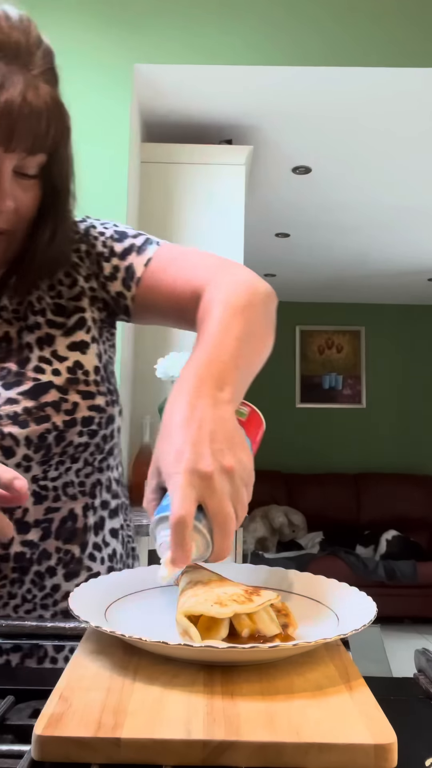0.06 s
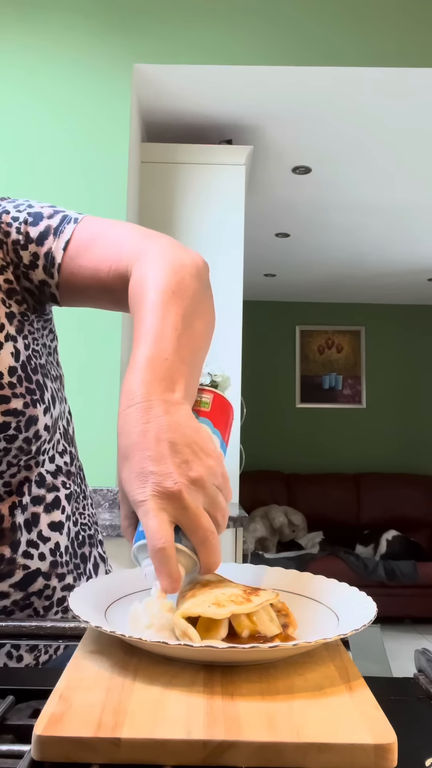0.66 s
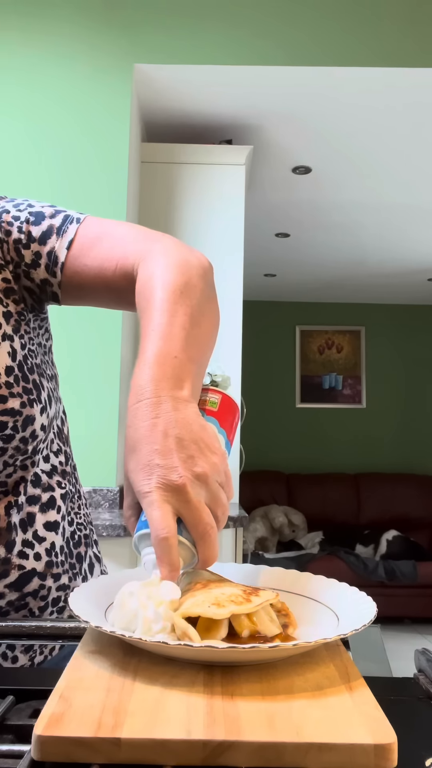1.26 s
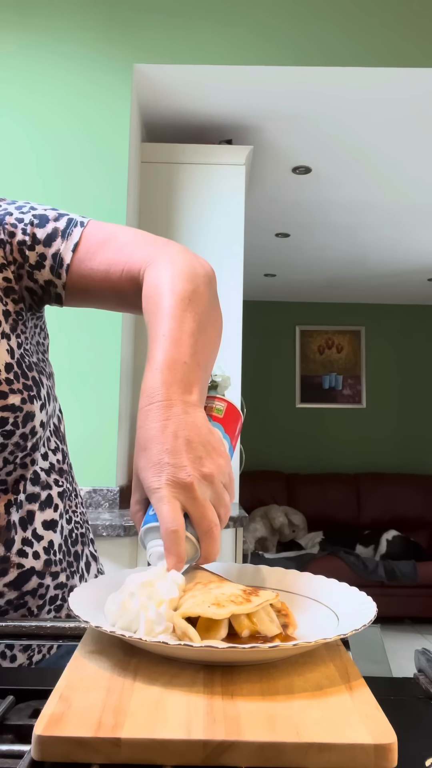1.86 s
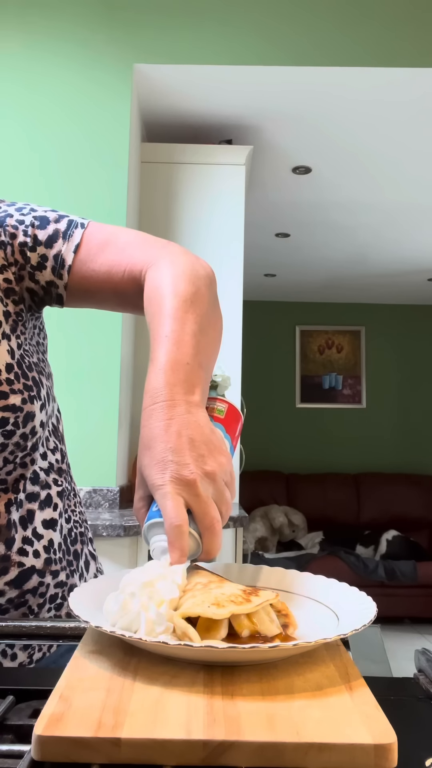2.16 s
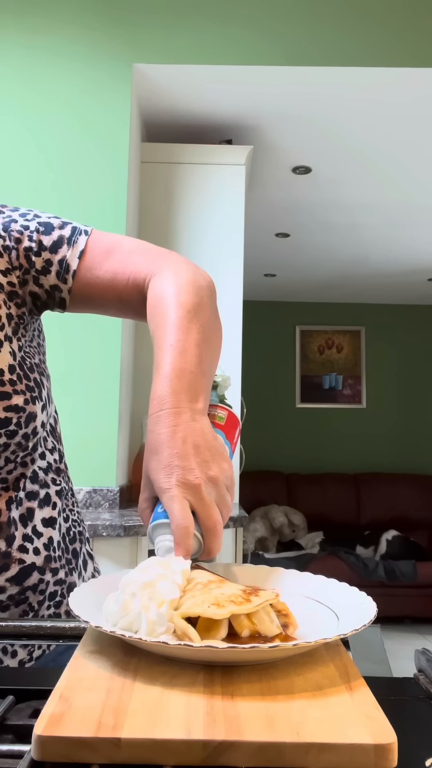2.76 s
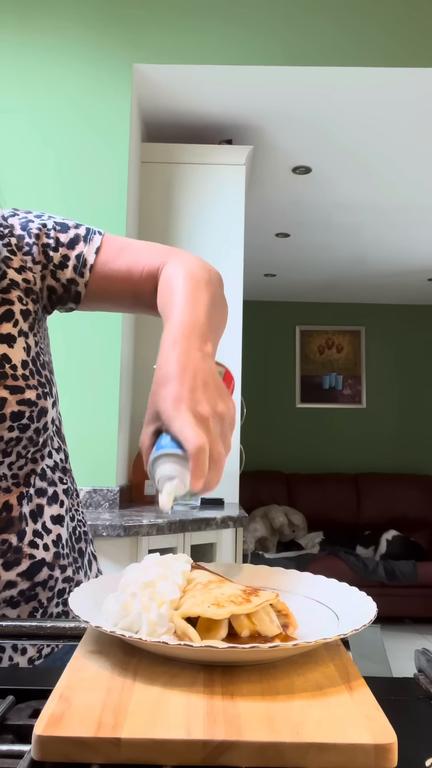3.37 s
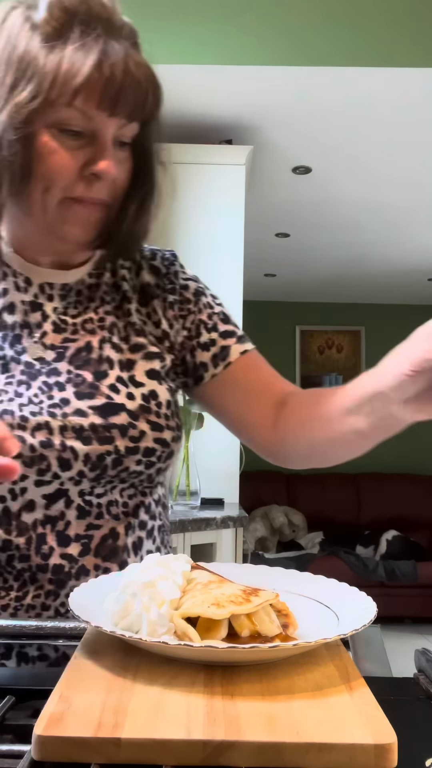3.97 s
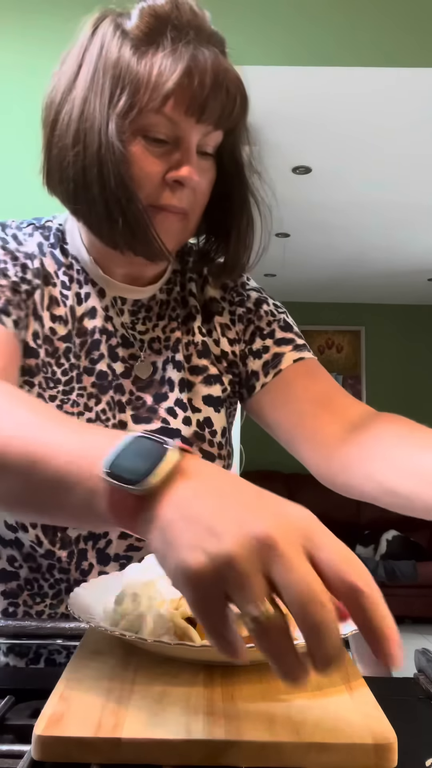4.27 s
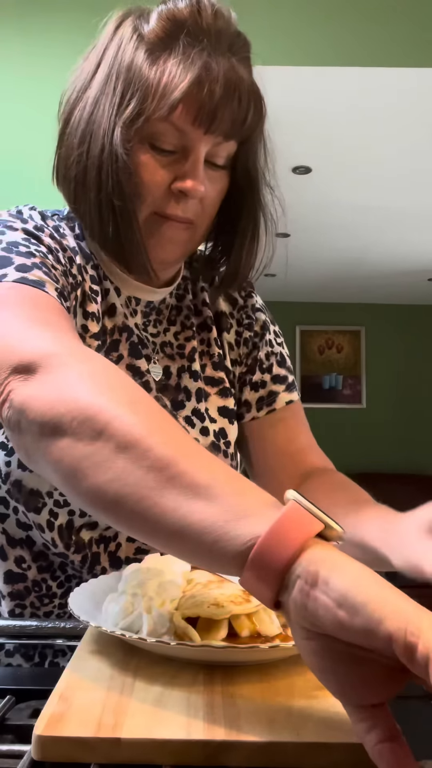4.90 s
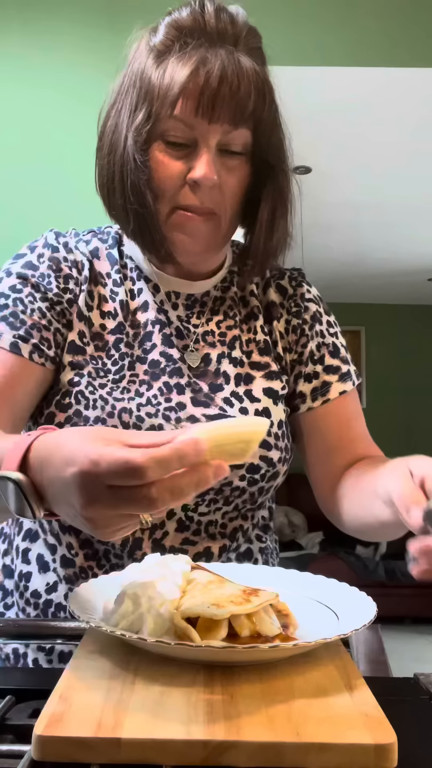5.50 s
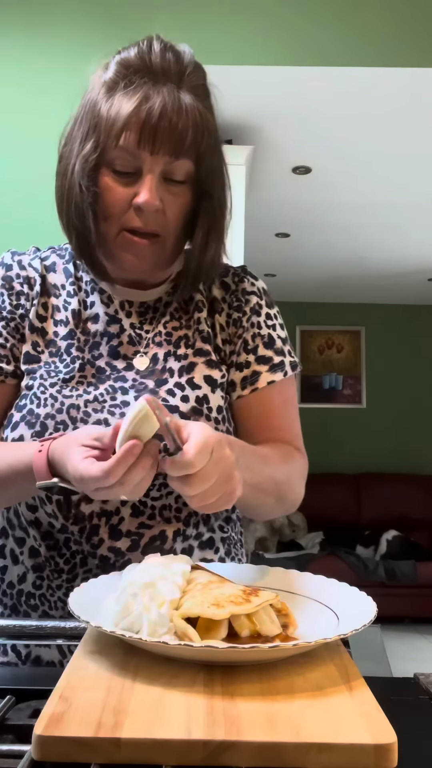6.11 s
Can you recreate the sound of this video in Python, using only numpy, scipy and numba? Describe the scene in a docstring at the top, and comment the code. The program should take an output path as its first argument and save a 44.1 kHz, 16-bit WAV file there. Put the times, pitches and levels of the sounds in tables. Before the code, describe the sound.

An aerosol can sprays cream with a steady, gurgling hiss in a kitchen, followed by a hard knock and a few light taps.

```python
"""A hand brushes softly over a low appliance hum, then whipped cream is sprayed onto a plate in a kitchen.
Turbulent gas hisses at the nozzle of the aerosol can and bursts through the foam, ringing a gas pocket
whose hollow note sinks and blurs as the heap grows. The valve snaps shut and the can is put down hard,
exciting the modes of can and worktop. Light taps, the faint ring of a knife and a padded bump follow."""
import sys
import numpy as np
from scipy import signal
from scipy.fft import rfft, irfft, next_fast_len
from scipy.io import wavfile
from scipy.ndimage import map_coordinates
from numba import njit

SR = 44100
rng = np.random.default_rng(int(sys.argv[2]) if len(sys.argv) > 2 else 0)


def persist_wave(psi):
    """Save psi, clipped to +-1, as 16-bit WAV."""
    counts = np.round(np.clip(psi, -1, 1) * 32767).astype(np.int16)
    wavfile.write(sys.argv[1], SR, np.atleast_2d(counts).T)


N = 271082
TIME = np.arange(N) / SR


def from_db(db):
    """Decibels to amplitude ratio."""
    return 10 ** (np.asarray(db) / 20)

def rms_one(x):
    """Normalisation to unit rms."""
    return x / np.sqrt(np.mean(x ** 2) + 1e-20)

def in_time(rows):
    """Linear interpolation over time, one curve per value column."""
    times_s, *columns = np.transpose(rows)
    return [np.interp(TIME, times_s, column) for column in columns]

def at_hz(points, hz):
    """Interpolation on a log-frequency axis."""
    known_hz, values = np.transpose(points)
    return np.interp(np.log(np.maximum(hz, 1)), np.log(known_hz), values)

def band(x, low_hz, high_hz):
    """Causal band-pass filtering."""
    edges_hz = [low_hz, min(high_hz, SR / 2 - 1)]
    return signal.sosfilt(signal.butter(2, edges_hz, "band", fs=SR, output="sos"), x)

def around(x, hz, width_ratio):
    """Band-pass filtering with a bandwidth proportional to the centre frequency."""
    return band(x, hz / (1 + width_ratio / 2), hz * (1 + width_ratio / 2))

def coloured(x, spectrum):
    """Spectral shaping by a table of relative levels; unit rms."""
    size = next_fast_len(len(x))
    gain = from_db(at_hz(spectrum, np.fft.rfftfreq(size, 1 / SR)))
    return rms_one(irfft(rfft(x, size) * gain, size)[:len(x)])

def drift(per_s):
    """Random modulation: lines joining values of unit spread."""
    knots = rms_one(rng.standard_normal(4096))
    return np.interp(TIME * per_s, np.arange(len(knots)), knots)

def swell(peak_s, spread_s):
    """Bell-shaped envelope."""
    return np.exp(-.5 * ((TIME - peak_s) / spread_s) ** 2)

def decay(t60_s, size):
    """Exponential decay over `size` samples."""
    return from_db(-60 * TIME[:size] / t60_s)

def impulses(rows):
    """Ideal impacts from rows of (start_s, level_db)."""
    out = np.zeros(N)
    for start_s, db in rows:
        out[round(start_s * SR)] += from_db(db)
    return out

def shot_noise(per_s, size_db, clump_db):
    """Shot noise: impulses at random times, uneven in size and louder in short clumps."""
    born = rng.random(N) < per_s / SR
    sizes = from_db(size_db * np.minimum(rng.exponential(1, N), 3) + clump_db * drift(130))
    return born * sizes * rng.choice([-1, 1], N)

def ring(force, modes):
    """Modal superposition: each mode answers an impulse with a damped sine."""
    out = 0
    for k, (hz, db, t60_s) in enumerate(modes):
        radius, angle = from_db(-60 / (t60_s * SR)), 2 * np.pi * hz / SR
        feedback = [1, -2 * radius * np.cos(angle), radius ** 2]
        out += (-1) ** k * from_db(db) * signal.lfilter([0, np.sin(angle)], feedback, force + 1e-18)
    return out

@njit
def moving_resonance(x, pole):
    """A resonator with a moving pole and constant noise power."""
    out, state = np.zeros(len(x)), 0j
    for i in range(len(x)):
        state = state * pole[i] + x[i] * np.sqrt(1 - abs(pole[i]) ** 2)
        out[i] = state.real
    return out

def resonate(x, hz, width_hz):
    """Forced resonance with variable centre and bandwidth."""
    return moving_resonance(x, np.exp((2j * hz - np.abs(width_hz)) * np.pi / SR))


# hands brushing can and cloth: peak_s, level_db, rise_s, t60_s
BRUSHES = [(0.0, -55, .01, 0.47), (3.67, -74, 0.019, 0.18), (5.765, -58.5, 0.016, 0.36)]
# friction spectrum: frequency_hz, relative_db
RUSTLE_SPECTRUM = [(800, -6.5), (2500, -1.5), (4500, -3), (7000, -8.5), (11000, -9.5), (15000, -14.5)]

def rustle(moving_s=3.38, moving_rise_s=.2, moving_db=-75.5):
    """Friction sheds tiny impulses: brief brushes, and a faint bed once the cook moves about."""
    level = from_db(moving_db) * np.clip((TIME - moving_s) / moving_rise_s, 0, 1)
    for peak_s, db, rise_s, t60_s in BRUSHES:
        age_s = TIME - peak_s
        level += from_db(db) * np.exp(np.minimum(age_s / rise_s, -np.log(1000) * age_s / t60_s))
    return level * coloured(shot_noise(per_s=4600, size_db=3, clump_db=1), RUSTLE_SPECTRUM)

# appliance partials: pitch_hz, level_db, waver_db
HUM_PARTIALS = [(100.4, -45.5, 0.5), (54, -56, 1), (200.6, -69, 5)]

def hum():
    """An appliance's low partials waver by amplitude and phase modulation."""
    out = np.zeros(N)
    for hz, db, waver_db in HUM_PARTIALS:
        amplitude = np.sqrt(2) * from_db(db + waver_db * drift(9.8))
        out += amplitude * np.sin(2 * np.pi * hz * TIME + 0.36 * drift(12))
    return out

# still air of the room: frequency_hz, relative_db
AIR_SPECTRUM = [(15, -54), (25, -15.5), (102, -10), (161, -20), (200, -24), (335, -29.5), (394, -28),
                (427, -34), (531, -32.5), (1890, -41.5), (2910, -50.5), (3250, -51), (16000, -65.5)]
# low rumble against the still air: time_s, gain_db
RUMBLE_GAIN = [(1.9, -10), (2.3, -5), (4.2, -2), (4.6, 6), (6.15, -3)]

def room_air(level_db=-60.5):
    """Broadband ambient noise, whose low rumble grows as the cook moves about."""
    air = coloured(rng.standard_normal(N), AIR_SPECTRUM)
    air /= np.std(band(air, 300, 15000))
    rumble_db, = in_time(RUMBLE_GAIN)
    rumble = from_db(rumble_db) * signal.sosfilt(signal.butter(2, 115, fs=SR, output="sos"), air)
    upper = signal.sosfilt(signal.butter(2, 170, "high", fs=SR, output="sos"), air)
    return from_db(level_db) * (upper - rumble)

def valve_gate(release_db_per_s, lag_s=0, open_s=0.21, close_s=3.014, attack_s=0.082):
    """The valve throttles a stream: quadratic rise, hold, then exponential decay."""
    opening = np.clip((TIME - open_s - lag_s) / attack_s, 0, 1) ** 2
    return opening * from_db(-release_db_per_s * np.maximum(TIME - close_s, 0))

# resonance of the gas pocket in front of the nozzle: time_s, pitch_hz, width_hz
GAS_POCKET = [(.3, 1310, 450), (.7, 1204, 102), (.98, 1170, 131), (1.22, 1110, 318), (1.4, 957, 318),
              (1.82, 890, 420), (2.05, 1140, 1050), (2.33, 1073, 282), (2.62, 1110, 600),
              (3.03, 1050, 1140)]
# the pocket's hollow note between surges: time_s, level_db
NOTE_LEVEL = [(.3, -41.5), (.48, -29.5), (1.0, -25), (1.42, -30.5), (1.95, -32.5), (2.46, -31.5),
              (3.02, -38)]
# surges of cream: peak_s, spread_s, note_lift_db, crackle_lift_db
SURGES = [(.52, .075, 2.5, 4.5), (0.714, 0.037, 6.5, 3.5), (0.964, 0.077, 3.5, 0), (1.167, 0.06, 2.5, 2.5),
          (1.58, 0.066, 7, 5.5), (2.044, 0.093, 1, 6.5), (2.55, 0.18, 0.9, 4)]
# large bubbles bursting: frequency_hz, relative_db
SPLUTTER_SPECTRUM = [(100, -52), (220, -9), (350, -3.5), (520, 3), (610, -3), (700, 7), (800, -4.5),
                     (1200, -9), (2500, -22.5)]
# small bubbles bursting: frequency_hz, relative_db
CRACKLE_SPECTRUM = [(900, -6.5), (1400, 5), (1800, 7), (2300, -0.5), (2800, -1), (3300, -11), (3650, -12),
                    (4400, -28), (8000, -18.5)]

def foam(note_gain_db=0.48, gurgle_db=1, skirt_ratio=7.3, upper_ratio=1.657):
    """Cavity resonance: bursting bubbles ring a gas pocket; large ones splutter, small ones crackle."""
    steady_db, = in_time(NOTE_LEVEL)
    pocket_hz, width_hz = in_time(GAS_POCKET)
    note_lift_db, crackle_lift_db = sum(
        np.outer(lifts_db, swell(peak_s, spread_s)) for peak_s, spread_s, *lifts_db in SURGES)
    swing_db = steady_db - np.mean(NOTE_LEVEL, axis=0)[1]
    # a deeper or leakier pocket splutters more
    deep_octaves, leaky_octaves = np.log2(1134 / pocket_hz), np.log2(width_hz / 480)
    splutter_db = -40.5 + 7.5 * deep_octaves + 2.5 * leaky_octaves + 0.15 * (swing_db + note_lift_db)
    crackle_db = -41 + 0.3 * leaky_octaves + 0.4 * swing_db + crackle_lift_db

    pops = shot_noise(per_s=1900, size_db=2.5, clump_db=0.5)
    hollow = resonate(pops, pocket_hz, width_hz)
    # a second, wider pass steepens the skirts of the note
    hollow = resonate(hollow, pocket_hz, skirt_ratio * width_hz) * np.sqrt(width_hz)
    note_db = steady_db + note_lift_db + note_gain_db + gurgle_db * drift(16)
    note = from_db(note_db) * rms_one(band(hollow, 707, 2010))
    upper_mode = resonate(pops, upper_ratio * pocket_hz, width_hz=380)
    overtone = from_db(crackle_db - 2) * rms_one(band(upper_mode, 990, 3740))
    splutter = coloured(shot_noise(per_s=1200, size_db=3, clump_db=2), SPLUTTER_SPECTRUM)
    crackle = coloured(shot_noise(per_s=2800, size_db=2.5, clump_db=4), CRACKLE_SPECTRUM)
    return note + overtone + from_db(splutter_db) * splutter + from_db(crackle_db) * crackle

# spits at the nozzle: peak_s, spread_s, pitch_hz, level_db
SPITS = [(0.31, 0.11, 450, -45), (0.314, 0.048, 2770, -42), (0.409, 0.022, 2630, -34),
         (2.96, 0.29, 2480, -40), (3, 0.2, 520, -41)]

def spits():
    """Trapped gas breaks out as band-limited shot noise, low when wet and high when dry."""
    spatter = shot_noise(per_s=3000, size_db=1, clump_db=2.5)
    return sum(from_db(db) * swell(peak_s, spread_s) * rms_one(around(spatter, hz, width_ratio=0.52))
               for peak_s, spread_s, hz, db in SPITS)

# hiss of the gas flow under the finger: time_s, level_db
FLOW_LEVEL = [(.3, -43), (.5, -39), (1.2, -38.5), (2.37, -38), (3.02, -41.5)]
# jet turbulence: frequency_hz, relative_db
HISS_SPECTRUM = [(1500, -25.5), (3000, 4), (4500, 0), (5500, -2.5), (6500, 0), (8200, -6.5), (9500, 1),
                 (11400, 3), (13300, 1), (15700, -4.5)]
# half whistles of the nozzle slit, against the hiss: peak_s, spread_s, pitch_hz, relative_db
WHISTLES = [(.85, .1, 13700, -12), (1.25, .22, 11200, -6.5), (2.42, .17, 12200, -12)]

def jet(bounce_s=0.00096, bounce_db=-17, sway_ratio=.012):
    """Turbulence hisses in the slit and interferes with its echo off the board as the hand sways."""
    flow_db, = in_time(FLOW_LEVEL)
    turbulence, whistle = rng.standard_normal(N), np.zeros(N)
    for peak_s, spread_s, hz, db in WHISTLES:
        tone = rms_one(resonate(turbulence, np.full(N, hz), width_hz=330))
        whistle += from_db(db) * swell(peak_s, spread_s) * tone
    level = from_db(flow_db + 0.67 * drift(90)) * valve_gate(release_db_per_s=177, lag_s=0.017)
    hiss = level * (coloured(rng.standard_normal(N), HISS_SPECTRUM) + whistle)
    delay_s = bounce_s * (1 + sway_ratio * drift(3.65))
    return hiss + from_db(bounce_db) * map_coordinates(hiss, [(TIME - delay_s) * SR], order=3)

# peaks and notches from plate and board: centre_hz, width_hz, gain_db
PLATE_BANDS = [(451, 22, -8), (567, 110, 2), (726, 33, 3.5), (798, 31, -9.5), (1138, 49, -11),
               (1224, 67, 3), (1431, 36, -15.5), (1452, 87, 10.5), (1548, 22, -16), (3260, 62, 6.5),
               (3230, 250, -6.5), (3620, 120, 6), (3940, 130, -1)]

def plate(x):
    """Interference with nearby reflections lifts or hollows the spray, one peaking filter a band."""
    for hz, width_hz, db in PLATE_BANDS:
        damping, gain = np.pi * width_hz / SR, from_db(db / 2)
        tuning = -2 * np.cos(2 * np.pi * hz / SR)
        x = signal.lfilter([1 + damping * gain, tuning, 1 - damping * gain],
                           [1 + damping / gain, tuning, 1 - damping / gain], x)
    return x

# valve, hand and cutlery contacts: start_s, level_db, low_hz, high_hz, high_gain_db, width_ratio, t60_s
TAPS = [(0.247, -43.5, 304, 1090, -7, 1, 0.44), (3.139, -36, 603, 1680, -4.5, 1, 0.027),
        (3.142, -38.5, 2910, 1690, 0.5, 0.15, 0.025), (3.787, -52, 910, 1380, -7, 0.57, 0.034),
        (4.75, -39, 295, 1090, -14.5, 0.94, 0.39), (4.978, -41.5, 2100, 4770, -2, 0.78, 0.049),
        (4.98, -63, 8000, 13000, 1.5, 0.53, 0.055), (5.171, -47.5, 740, 1100, -10, 0.56, 0.066),
        (5.212, -36.5, 664, 1150, -5, 0.47, 0.12), (5.220, -36, 700, 1100, 2.5, 0.31, 0.066),
        (5.279, -48, 424, 1990, -9, 0.93, 0.2), (5.644, -53.5, 8850, 10400, 1, 0.44, 0.031),
        (5.765, -54, 1210, 4200, -10.5, 0.31, .06)]

def taps():
    """Each light impact excites two damped resonances, heard as decaying bands of noise."""
    out, size = np.zeros(N), SR // 4
    for start_s, db, low_hz, high_hz, high_gain_db, width_ratio, t60_s in TAPS:
        envelope = decay(t60_s, size)
        low, high = [rms_one(around(rng.standard_normal(size), hz, width_ratio) * envelope)
                     for hz in (low_hz, high_hz)]
        level = from_db(db) * np.sqrt(np.mean(envelope ** 2))
        start = round(start_s * SR)
        out[start:start + size] += level * (low + from_db(high_gain_db) * high)[:N - start]
    return out

# valve stem: pitch_hz, level_db, t60_s
STEM_MODES = [(2870, -44.5, 0.11)]

def valve_ping(start_s=3.141):
    """Free vibration of the stem after the valve snaps shut."""
    return ring(impulses([(start_s, 0)]), STEM_MODES)

def can_scrape(level_db=-70.5):
    """Narrow-band friction noise: a faint, thin, uneven scrape as the can is handled."""
    envelope = np.interp(TIME, [4.0, 4.06, 4.25, 4.42], [0, 1, 1, 0])
    level = envelope * from_db(level_db + 3 * drift(30))
    return level * rms_one(band(rng.standard_normal(N), 2700, 3100))

# crack of the can's rim on the worktop: frequency_hz, relative_db
CRACK_SPECTRUM = [(150, -19), (400, -2.5), (1000, 2), (1700, 0.5), (2600, -7.5), (3600, -13.5), (5000, -19),
                  (7000, -25), (11000, -31.5), (16000, -39.5)]

def rim_crack(level_db=-8.5, t60_s=0.088):
    """Modal overlap: so many stiff modes sound at once that their spectrum is smooth."""
    size = SR // 2
    burst = rng.standard_normal(size) * decay(t60_s, size) * np.minimum(TIME[:size] / .002, 1)
    phase = np.angle(rfft(burst))
    magnitude = from_db(at_hz(CRACK_SPECTRUM, np.fft.rfftfreq(size, 1 / SR)))
    crack = irfft(magnitude * np.exp(1j * phase))[:size // 2]
    crack *= np.linalg.norm(burst) / np.linalg.norm(crack)
    return from_db(level_db) * crack * np.minimum(TIME[:size // 2] / .0005, 1)

# the rim lands, then the base rocks flat: start_s, level_db
CAN_IMPACTS = [(4.3985, -0.5), (4.4030, -6), (4.4112, -16)]
# can against the worktop: pitch_hz, level_db, t60_s
CAN_MODES = [(237.5, -28.5, 0.077), (285, -30.5, 0.55), (333.6, -24.5, 0.11), (404, -28.5, 0.12),
             (475, -17.5, .08), (635, -20.5, 0.04), (926, -22.5, 0.062), (1210, -13.5, 0.13),
             (1576, -22, 0.14), (1880, -27, 0.12), (2153, -18, 0.036), (2370, -28.5, 0.077),
             (2720, -23, 0.06), (3063, -28.5, 0.065)]
# slow bending of the worktop: pitch_hz, level_db, t60_s
WORKTOP_MODES = [(56, -34, 0.64), (80, -16.5, 0.24), (144.6, -14, 0.22), (198.2, -24.5, 0.25)]

def can_knock(push_hz=900, push_t60_s=0.0057):
    """Impact excitation: the steel rim cracks and rings, then the settling base bends the worktop."""
    landing = impulses(CAN_IMPACTS[:1])
    settling = impulses([(CAN_IMPACTS[-1][0], 0)])
    push = ring(impulses(CAN_IMPACTS), [(push_hz, 0, push_t60_s)])
    crack = signal.fftconvolve(landing, rim_crack())[:N]
    return ring(landing, CAN_MODES) + ring(settling, WORKTOP_MODES) - push + crack

# knife blade: pitch_hz, level_db, t60_s
BLADE_MODES = [(4200, -71, 1.1), (6600, -73, .25), (7650, -70, .15), (8350, -71.5, .9), (8950, -69, .14),
               (9900, -70, .25), (13050, -75, .7)]

def knife(start_s=4.745):
    """A nudged knife gives a faint, high, diffuse ring; random modulation broadens each mode."""
    nudge = impulses([(start_s, 0)])
    return sum(ring(nudge, [mode]) * drift(180) for mode in BLADE_MODES)

# an arm meeting the worktop: start_s, level_db
ARM_IMPACTS = [(5.074, -6), (5.085, -3)]
# resonance under the arm: pitch_hz, level_db, t60_s
BUMP_MODES = [(86.4, -26.5, 0.13)]

def arm_bump():
    """A padded impact excites only a low mode."""
    return ring(impulses(ARM_IMPACTS), BUMP_MODES)

# reverberation time of the kitchen: frequency_hz, t60_s
ROOM_T60 = [(200, 0.41), (1200, 0.53), (3000, 0.49), (7000, 0.46), (14000, 0.25)]

def kitchen(x, wet_db, build_s=0.0081):
    """Reverberation: dense wall reflections build up, then die away, the highest treble first."""
    echo = np.zeros(SR)
    edges_hz = np.geomspace(140, 17000, 9)
    for low_hz, high_hz in zip(edges_hz, edges_hz[1:]):
        t60_s = at_hz(ROOM_T60, np.sqrt(low_hz * high_hz))
        echo += band(rng.standard_normal(SR), low_hz, high_hz) * decay(t60_s, SR)
    echo *= np.clip(TIME[:SR] / build_s, 0, 1)
    return x + from_db(wet_db) * signal.fftconvolve(x, echo / np.linalg.norm(echo))[:N]

def scene():
    """Superposition: the spray is near; knock and taps, further off, carry more reverberation."""
    scrape = can_scrape()
    cream = (foam() + spits()) * valve_gate(release_db_per_s=397)
    near = kitchen(plate(cream + jet()) + valve_ping() + scrape, wet_db=-9.5)
    far = kitchen(can_knock(), wet_db=-8.5) + kitchen(taps() + knife() + rustle(), wet_db=-8)
    return (near + far + arm_bump() + hum() + room_air())[None]

def record(dry, ceiling=.95, cutoff_hz=15800):
    """Soft saturation rounds the highest peaks; a steep low-pass removes the top treble."""
    rounded = dry / (1 + (dry / ceiling) ** 6) ** (1 / 6)
    return signal.sosfilt(signal.ellip(12, .1, 90, cutoff_hz, fs=SR, output="sos"), rounded)


dry = scene()
out = record(dry)
persist_wave(out)
```